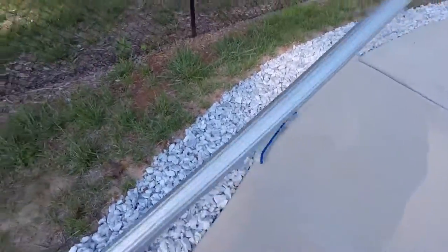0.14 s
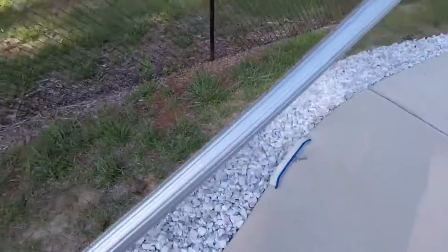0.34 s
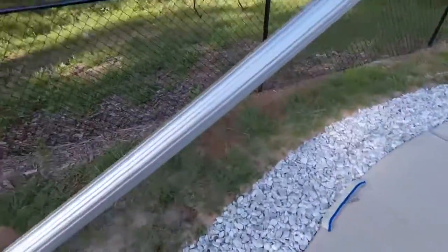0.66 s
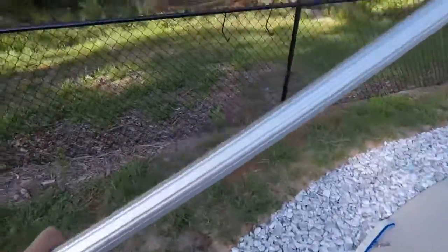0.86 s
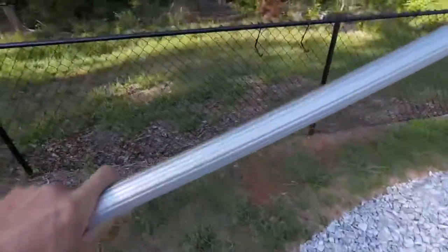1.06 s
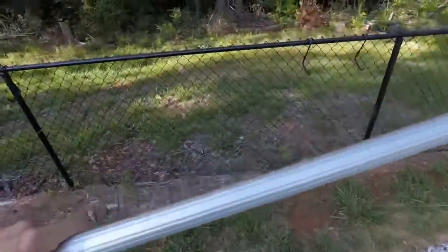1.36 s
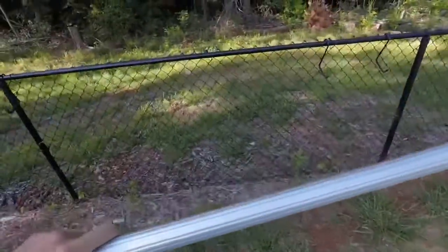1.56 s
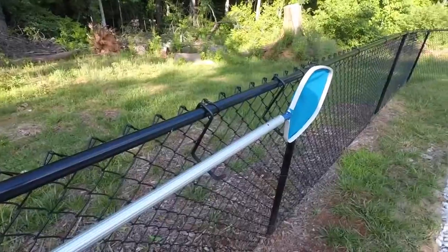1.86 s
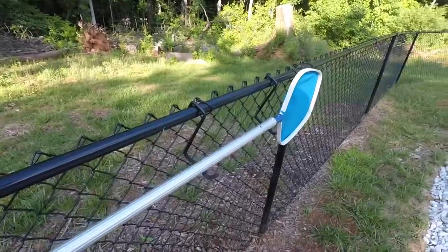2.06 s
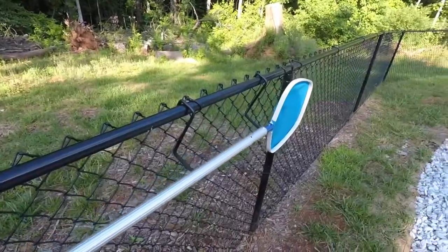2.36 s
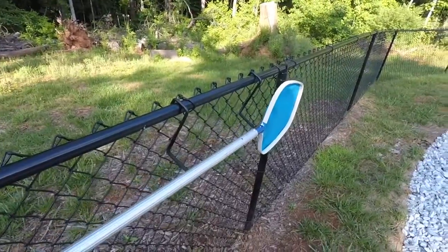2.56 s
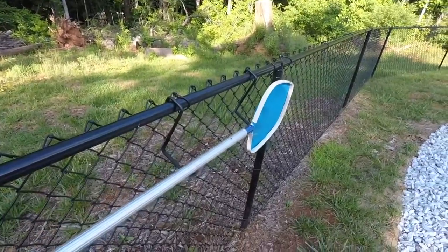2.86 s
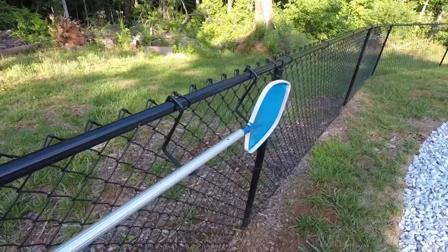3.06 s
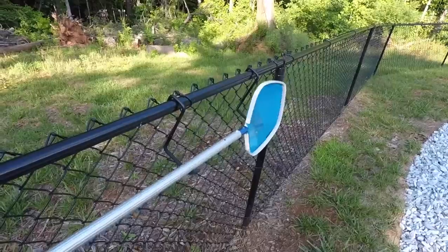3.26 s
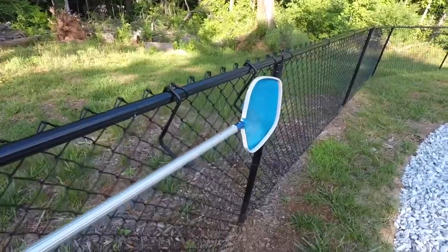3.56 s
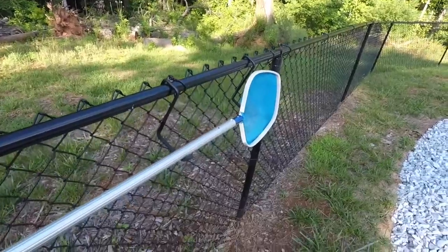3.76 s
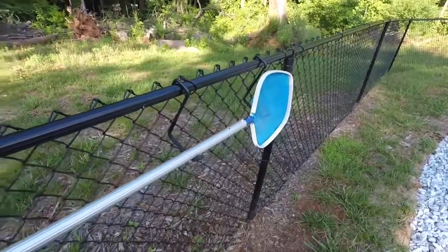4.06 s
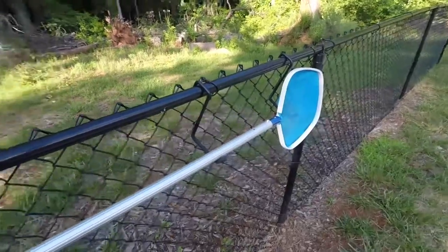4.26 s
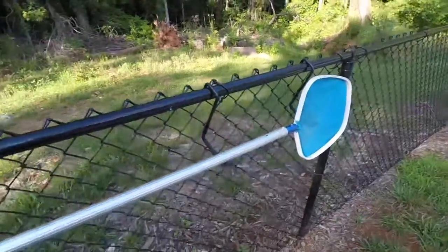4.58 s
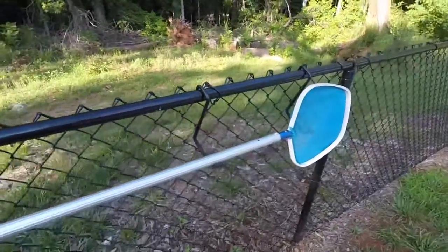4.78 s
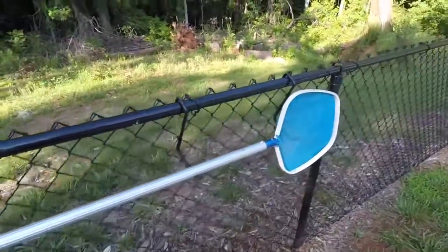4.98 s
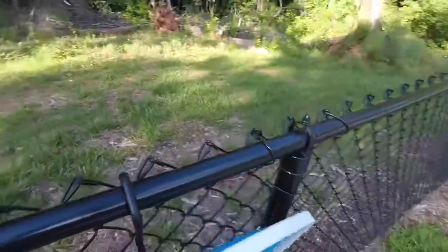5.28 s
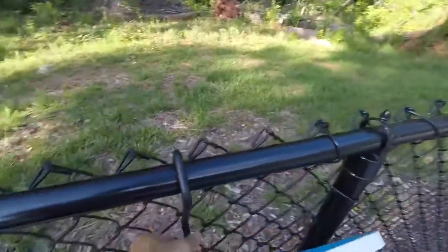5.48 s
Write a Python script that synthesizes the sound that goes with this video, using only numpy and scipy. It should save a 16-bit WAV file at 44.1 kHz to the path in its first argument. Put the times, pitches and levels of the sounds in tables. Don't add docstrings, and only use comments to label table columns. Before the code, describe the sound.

In a garden beside trees, a small hand-held camera microphone catches low wind rumble, faint traffic, soft machine hum and thin leaf hiss throughout. From 0 to 1.6 s someone walks: irregular dry crunches, snaps and scuffs, strongest near 0.13 s, with a dull handling bump near 0.2 s. A small bird repeats swift whistled phrases about every 0.3 s, each plunging from high to low and hooking upward, echoed by fence and trees. A tiny watery plip falls at 1.1 s, and pebbles crunch at 1.5 s. The bird's louder last phrases end by about 2 s. Fast, pulsing high insect trills run about 2.2-2.8, 3.2-3.8 and 4.4-5.2 s, the last strongest. Faint distant chips come near 3.7-4 s. A crisp pole tick at 4.35 s precedes a deep wind buffet. Birdsong resumes around 4.7-5.6 s, with small knocks, a faint drip and another low buffet near the close.

```python
import sys
import numpy as np
from scipy import signal
from scipy.fft import rfft, irfft, next_fast_len
from scipy.io import wavfile
from scipy.ndimage import uniform_filter1d, map_coordinates

SR = 44100
rng = np.random.default_rng(int(sys.argv[2]) if len(sys.argv) > 2 else 0)


def master_out(mix):
    frames = np.transpose(np.atleast_2d(mix))
    ceiling = np.clip(frames, -1, 1)
    pcm = np.round(ceiling * 32767).astype(np.int16)
    wavfile.write(sys.argv[1], SR, pcm)


def volts_from_db(level):
    exponent = np.asarray(level, float) / 20
    return 10 ** exponent


N = 248283


def unit(x):
    return x / np.sqrt(np.mean(x ** 2) + 1e-20)


def along(points, hz):
    f, v = np.transpose(points)
    return np.interp(np.log(hz + 0.054), np.log(f), v)


def curves(rows, t):
    s, *cols = np.transpose(rows)
    return [np.interp(t, s, c) for c in cols]


def wobble(rate):
    return map_coordinates(rng.standard_normal(int(N * rate / SR) + 4), [np.arange(N) * rate / SR])


def bump(t, s, width):
    return np.exp(-.5 * ((t - s) / max(width, .005)) ** 2)


def coloured(x, spectrum):
    m = next_fast_len(N + 8192)
    gain = volts_from_db(along(spectrum, np.fft.rfftfreq(m, 1 / SR)))
    return irfft(rfft(x, m) * unit(gain), m)[:N]


def noise(spectrum):
    return unit(coloured(rng.standard_normal(N), spectrum))


def add(track, s, sound):
    part = track[round(s * SR):][:len(sound)]
    part += sound[:len(part)]


# moment in seconds, width in seconds, head change in dB, tail change in dB.
BODY_TURN = (4.81, .035, 4, -14)


def stroke(s, first, last, levels):
    head_db, swell_db, tail_db, start_db = levels
    warm_up_s, tail_swell = .035, 0.47
    left = (last - s) / (last - first)
    soft_db = start_db * np.exp(-(s - first) / warm_up_s)
    turn = bump(s, *BODY_TURN[:2])
    return (head_db - swell_db * left - .5 * soft_db + BODY_TURN[2] * turn,
            tail_db - tail_swell * swell_db * left - soft_db + BODY_TURN[3] * turn)


# onset of the last pulse in seconds, number of pulses, pulses per second.
TRILLS = [(2.7765, 35, 57.1), (3.782, 32, 57.1), (5.016, 35, 57.1), (5.2335, 12, 57.4)]
# high head of the last pulse in dB, head swell over the trill in dB,
# low tail in dB, softer start in dB.
TRILL_LEVELS = [(-61.5, 10, -60, 14), (-60.5, 14, -58, 10), (-55.5, 4, -55, 36), (-56, 12, -57, 0)]
FILE_REACH = [1.04, 1.12, 1.0, 1.0]


def insect():
    early_sag = .038
    ground_db, ground_s, ground_drift = 3, .0008, .5
    leaf_db, leaf_s = -12.5, .004
    out, t = np.zeros(N), np.arange(round(.011 * SR)) / SR
    u = t / 0.0077
    for (last, count, rate), levels, reach in zip(TRILLS, TRILL_LEVELS, FILE_REACH):
        chance = rng.standard_normal((count, 4))
        bounce = np.cumsum(ground_drift * rng.standard_normal(count)) + 2 * np.pi * rng.random()
        edge = np.clip(t / .0011, 0, 1) * np.clip((reach - u) / .25, 0, 1)
        for k, (late, size, detune, beat) in enumerate(chance):
            s = last - k / rate + 0.00038 * late
            head_db, tail_db = stroke(s, last - count / rate, last, levels)
            level = volts_from_db(head_db + (tail_db - head_db) * np.clip(4 * u - 1.9, 0, 1) + .3 + 2.1 * size)
            flutter = 1 + 0.17 * np.sin(2 * np.pi * 330 * t + 3 * beat)
            hz = (7200 - 350 * u - 950 * u ** 2) * (1 + 0.0057 * detune - early_sag * k / count)
            level *= volts_from_db(ground_db * np.cos(2 * np.pi * hz * ground_s + bounce[k]))
            chirp = edge * level * flutter * np.sin(2 * np.pi * np.cumsum(hz) / SR)
            add(out, s, chirp)
            add(out, s + leaf_s * (1 + .3 * np.tanh(beat)), volts_from_db(leaf_db) * chirp)
    return out


def whistle(note, t, db):
    hz, level = curves(note, t)
    alive = (t > note[0][0]) & (t < note[-1][0])
    return alive * volts_from_db(db + level) * np.sin(2 * np.pi * np.cumsum(hz) / SR)


def twigs(tone, spread, scatter_db):
    path = np.zeros(round(spread * SR) + 2)
    path[0] = 1
    where, size = rng.random((2, 5))
    path[1 + (where * (len(path) - 2)).astype(int)] = volts_from_db(scatter_db) * (2 * size - 1)
    return np.convolve(tone, path / np.linalg.norm(path))


# frequency in Hz, t60 in seconds.
WOOD_T60 = [(1500, 0.75), (2900, 1.55), (4500, .9), (7000, 0.55)]
# frequency in Hz, level in dB.
WOOD_COLOUR = [(1500, -2), (3000, -6), (4500, 0), (6000, 7), (7000, 2.5)]


def trees(x):
    hz, t, z = signal.stft(rng.standard_normal(SR * 3 // 2), SR, nperseg=256)
    fade_db = along(WOOD_COLOUR, hz)[:, None] - 60 * t / along(WOOD_T60, hz)[:, None]
    tail = signal.istft(z * volts_from_db(fade_db) * np.clip(t / .04, 0, 1), SR, nperseg=256)[1]
    return volts_from_db(-34.5) * signal.fftconvolve(x, tail)[:len(x)]


def brightened(note, late, slope_db, gap_db):
    s, hz, level = np.transpose(note)
    gap = gap_db * np.exp(-.5 * (np.log2(hz / 5470) / 0.093) ** 2)
    tilt = slope_db * np.log2(hz / 3800)
    return np.transpose([s + late * np.clip(s / .04, 0, 1), hz, level + gap + tilt])


# time from phrase start in seconds, pitch in Hz, level in dB.
HOOK = [(.16, 2050, -26), (.165, 2280, -6), (.171, 2620, -4), (.177, 2830, -2), (.185, 2945, 0),
        (.192, 2905, -3), (.198, 2780, -9), (.203, 2660, -30)]


def hooks(ratio):
    sung = np.multiply(HOOK, [1, ratio, 1])
    duller_db = 11 * np.log2(sung[:, 1] / sung[:, 1].max())
    return sung, sung + np.outer(duller_db, [0, 0, 1])


# time from phrase start in seconds, pitch in Hz, level in dB.
HEAD = [(0, 6950, -20), (.008, 6800, -11), (.022, 6680, -9), (.04, 6560, -26)]
FALL = [(0, 6950, -26), (.008, 6830, -20), (.036, 6150, -17), (.042, 5900, -15), (.046, 5400, -13),
        (.05, 4700, -8), (.056, 3800, -3), (.065, 3120, -7), (.073, 2890, -8), (.079, 2860, -35)]
LOW = [(.08, 2270, -32), (0.085, 2240, -11), (0.096, 2130, -9), (0.11, 2060, -10), (.12, 2040, -40)]
FLICK = [(.203, 3700, -24), (.207, 3200, -12), (.211, 2750, -7), (.216, 2500, -4), (.228, 2420, -5),
         (.242, 2390, -26)]
ECHO_S = [.0215, .024, .031]


def phrase(row, facing, droop, manner, gap_db, hook_ratio, wet_db):
    s, shift, fall_db, hook_db, wall_db = row
    low_db, flick_db, fence_db, head_db, near_db = facing
    late, lag, bright_db, fence_bright_db = manner
    t = np.arange(SR // 4) / SR
    sagging = HEAD[0] + np.subtract(HEAD, HEAD[0]) * [1, droop, 1]
    head = whistle(sagging, t, fall_db + head_db)
    fall = whistle(brightened(FALL, late, bright_db, gap_db), t, fall_db)
    fence = whistle(brightened(FALL, late, fence_bright_db, gap_db), t, fall_db)
    low = whistle(LOW, t - late, hook_db + low_db) + whistle(FLICK, t - shift - lag, hook_db + flick_db)
    low, wall = [low + whistle(hook, t - shift, hook_db) for hook in hooks(hook_ratio)]
    song = np.zeros(N + SR)
    add(song, s + 1, fall + low + head)
    heard = volts_from_db(wet_db) * trees(song)
    add(heard, s + 1, twigs(fall + volts_from_db(near_db) * head, spread=.008, scatter_db=-2))
    add(heard, s + 1, twigs(low, spread=.006, scatter_db=-7))
    add(heard, s + 1 + ECHO_S[0], volts_from_db(fence_db) * twigs(fence, spread=.01, scatter_db=-1))
    add(heard, s + 1 + ECHO_S[1], volts_from_db(wall_db) * twigs(wall, spread=.004, scatter_db=-13))
    add(heard, s + 1 + ECHO_S[2], twigs(head, spread=.008, scatter_db=-3))
    return heard


CUTS = [0, 1.605, 5.026, 6]
# start in seconds, shift of the hook in seconds, fall level in dB,
# lower notes in dB, wall echo in dB.
PHRASES = [
    [(-.176, 0, -56, -61, 0), (.124, -0.012, -49.5, -47.5, -2), (.404, 0.00074, -47, -45, 2),
     (.695, 0.0011, -46, -44, 0), (.983, 0.0017, -48, -45, 1.5)],
    [(1.383, 0.0044, -40, -40.5, -0.5), (1.682, 0, -40.5, -41.5, -2)],
    [(4.73, 0, -50, -48.5, 0.5), (5.024, 0.00029, -45, -43.5, -1.5), (5.319, 0.0065, -49, -48, -0.3)],
]
# low note in dB, flick in dB, fence echo of the fall in dB,
# head in dB, direct share of the head in dB.
FACING = [
    [(9, 0, -4, 0, -8), (3.5, 4.5, -1.5, 0, -8), (2.5, -0.5, 2, -2.5, -3), (3.5, 0.5, 1, -2, -7),
     (3.5, -0.5, -3, -1.5, 2)],
    [(1.5, -4, -5, -12, -6), (1.5, -0.5, -6, -7, -9)],
    [(-4, 3.5, -2, -9, -6), (2, -2.5, 3.5, -10, -3), (-1, 0.5, 2.5, -11, 9)],
]
DROOP = [
    [1, 1.3, 1, 1.1, 2],
    [1, 1],
    [1, 1, 1.2],
]
# delay of the fall in seconds, delay of the flick in seconds,
# brightness of the fall in dB per octave, brightness of its echo in dB per octave.
MANNER = [
    [(0, 0.0022, 0, 0), (0, .008, -4, 0), (.0015, 0.0043, 1, 2), (0.0015, 0.00032, 0, 3), (.003, 0, 7.5, 8)],
    [(0, .007, -1, 0), (0, 0.00203, -2, 0)],
    [(0, 0.0027, 0, 0), (0.0003, .001, -4, 1), (.007, 0.0013, 1, 2)],
]
WET_DB = [2.5, -3, 1.5]


def wren():
    out, clock = np.zeros(N), np.arange(N) / SR
    gap_dbs, hook_ratios = [-3, -9, -13], [1.02, 1.005, 1.005]
    for shot, (start, end) in enumerate(zip(CUTS, CUTS[1:])):
        place = gap_dbs[shot], hook_ratios[shot], WET_DB[shot]
        rows = zip(PHRASES[shot], FACING[shot], DROOP[shot], MANNER[shot])
        heard = sum(phrase(*row, *place) for row in rows)
        shown = np.clip((clock - start) / .004, 0, 1) * np.clip((end - clock) / .004, 0, 1)
        out += heard[SR:] * shown
    return out


def contacts(events):
    grit, thud, t = np.zeros(N), np.zeros(N), np.arange(SR // 20) / SR
    for s, db, low_db, t60 in events:
        a, b, spikes = rng.standard_normal((3, len(t)))
        shape = volts_from_db(db - 60 * t / max(t60, .003)) * np.clip(t / .0005, 0, 1)
        add(grit, s, shape * volts_from_db(-3.5 + 3.5 * spikes) * a)
        add(thud, s, shape * volts_from_db(low_db + 0.5) * b)
    return grit, thud


# start in seconds, peak in dB, low thud in dB.
PEBBLE_STEP = [(1.507, -48, -7), (1.5095, -48, -7), (1.51, -39, -11), (1.516, -38.5, -9), (1.5201, -37, -9),
               (1.5268, -34, -6), (1.5322, -42, -7), (1.5364, -42, -7), (1.5427, -45, -7),
               (1.5482, -43, -5), (1.5516, -44, -7), (1.5554, -48, -7), (1.5664, -48, -4), (1.574, -48, -5),
               (1.5736, -44, -6), (1.5776, -47, -5), (1.5824, -44, -6), (1.5874, -49, -5),
               (1.5924, -50, -7), (1.5993, -51, -7), (1.6054, -49, -5)]


def stones():
    chance = 2 * rng.random((len(PEBBLE_STEP), 2)) - 1
    return [(s, db - 4 + 0.5 * size, low_db, 0.012 * (1 + 0.27 * ring))
            for (s, db, low_db), (ring, size) in zip(PEBBLE_STEP, chance)]


def drag(rows):
    out = np.zeros(N)
    for s, length, db, fade_db in rows:
        t = np.arange(0, length, 1 / SR)
        rise = t + (s < .001)
        edge = np.clip(np.minimum(rise, length - t) / 0.011, 0, 1)
        spikes = uniform_filter1d(rng.standard_normal(len(t)), size=40)
        add(out, s, edge * volts_from_db(db + fade_db * t / length + 2.5 * unit(spikes)) * rng.standard_normal(len(t)))
    return out


def snaps(rows):
    roughness, width = 0.67, .25
    out, t = np.zeros(N), np.arange(SR // 14) / SR
    for s, db, hz, t60 in rows:
        rough = unit(uniform_filter1d(rng.standard_normal(len(t)), size=round(SR / (width * hz))))
        ring = (1 + roughness * rough) * np.sin(2 * np.pi * hz * t)
        add(out, s, volts_from_db(db - 60 * t / max(t60, .003)) * np.clip(t / .001, 0, 1) * ring)
    return out


# start in seconds, peak in dB, low thud in dB, t60 in seconds.
STEPS = [(0.0154, -51, -5, 0.02), (0.0285, -44, -14, 0.022), (0.0425, -43, -7, 0.029),
         (0.1225, -35.5, -35, 0.033), (0.129, -34.5, -5, 0.0094), (0.1324, -48, -0.5, 0.057),
         (0.177, -42, -15, 0.058), (0.181, -42, -22, 0.012), (0.2655, -47, -21, 0.065),
         (0.2774, -49, -7, 0.024), (0.2864, -49.5, -2, 0.029), (0.3822, -44.5, -22, 0.017),
         (0.409, -49, -6, 0.028), (0.5432, -47, -8, 0.017), (0.82, -46.5, -9, 0.029),
         (0.8262, -47, -8, 0.027), (0.8488, -49, -6, 0.031), (1.1367, -46, -7, 0.016),
         (1.2252, -44, -2, 0.036), (1.2372, -47, -4, 0.025), (1.3175, -54.5, 0.5, 0.042),
         (1.4216, -52, -8, 0.019), (3.2904, -58, -17, 0.015), (4.3469, -37.5, -16, 0.0091),
         (5.033, -53, -1, 0.016), (5.3165, -50, 3, 0.014), (5.5658, -56, 4, 0.017)]
# start in seconds, length in seconds, peak in dB, fade in dB.
SCUFF = [(0, 0.3, -69, -20), (.805, .07, -61, -9), (1.135, 0.108, -62, -8)]
PEBBLE_SCUFF = [(1.502, 0.058, -57.5, 0), (1.556, 0.062, -59.5, -6)]
SWISH = [(1.148, .075, -61.5, -7)]
# start in seconds, peak in dB, pitch in Hz, t60 in seconds.
SNAPS = [(.029, -47, 4500, .02), (.032, -43, 2300, .015), (.043, -45.5, 8600, 0.014),
         (.123, -45, 8900, .015), (.129, -41, 8400, .015), (.124, -56, 624, 0.054), (.124, -48.5, 858, .06),
         (.178, -48, 8600, .03), (.181, -44.5, 5550, 0.027), (.18, -52, 13200, .02),
         (.2655, -47.5, 8440, .02), (.2655, -49, 3870, .02), (.278, -49, 8600, 0.016),
         (.821, -50, 7650, 0.032), (.823, -46, 5550, .02), (1.137, -46.5, 7650, .015),
         (1.137, -49, 3600, .012), (1.139, -53, 525, .07), (1.225, -45, 9000, .02), (1.226, -49, 840, .07),
         (1.226, -50, 640, .07), (1.317, -55, 7540, .02), (1.318, -52, 9800, .015),
         (1.424, -58, 4600, .012), (1.527, -40, 6500, .012), (1.607, -52, 6800, .015),
         (3.292, -52, 8200, 0.011), (5.033, -43, 720, .014), (.411, -55, 9360, .02),
         (5.317, -53, 7900, .012), (5.317, -50, 4200, .012)]
# frequency in Hz, level in dB per Hz.
GRIT = [(1180, -13), (2000, -10), (2700, -2), (3850, -6.5), (4260, -3.5), (5220, -8), (6740, -8.5),
        (15200, -31)]
PEBBLES = [(1200, -35), (2200, -6.5), (3500, -4.5), (4800, -7.5), (6000, 0.5), (7500, -0.5), (10000, -15),
           (15300, -32)]
THUD = [(150, -120), (300, -25), (600, -5), (1200, 8.5), (2200, -6), (3500, -50), (6000, -120)]
HISS = [(4000, -120), (6000, -19), (8000, 0.5), (10000, -2), (13000, -2.5), (16000, -4)]


def feet():
    grit, thud = contacts(STEPS)
    pebbles, push = contacts(stones())
    out = coloured(grit + drag(SCUFF), GRIT)
    out += coloured(pebbles + drag(PEBBLE_SCUFF), PEBBLES)
    out += coloured(thud + push, THUD)
    return out + coloured(drag(SWISH), HISS) + snaps(SNAPS)


# pitch in Hz, level in dB, t60 in seconds.
TICK = (4.3474, [(2300, -48, 0.01), (3600, -38, 0.0058), (6400, -37.5, 0.0056), (9500, -48, 0.0052)])
# start in seconds, peak in dB, pitch in
# Hz, t60 in seconds.
MORE_SNAPS = [(.383, -50, 3020, .012), (.384, -51, 8600, .012), (1.079, -52, 4200, .01),
              (1.079, -54, 5800, .01), (5.033, -53, 450, .015), (5.322, -48.5, 450, .045),
              (5.316, -54, 799, 0.018)]


def pole():
    out, t = np.zeros(N), np.arange(SR // 50) / SR
    s, modes = TICK
    add(out, s, sum(volts_from_db(db - 60 * t / t60) * np.sin(2 * np.pi * hz * t) for hz, db, t60 in modes))
    return out + snaps(MORE_SNAPS)


# start in seconds, peak in dB, pitch in Hz, life in seconds.
DRIPS = [(1.078, -37, 945, 0.0081), (2.661, -59, 923, 0.044), (5.53, -48, 880, 0.0113)]


def drips():
    out = np.zeros(N)
    for s, db, hz, life in DRIPS:
        climb = 0.0035 / life
        u = np.arange(0, 1, 1 / (life * SR))
        tone = np.sin(2 * np.pi * np.cumsum(hz * (1 + climb * u)) / SR)
        add(out, s, volts_from_db(db) * np.sin(np.pi * u) ** 1.15 * tone)
    return out


# centre in seconds, peak in dB, pitch in Hz, width in seconds.
BUMPS = [(.172, -41.5, 105, .007), (0.853, -47, 102, 0.0057), (1.135, -52, 75, 0.011),
         (1.385, -55, 90, 0.0066), (4.775, -47, 120, .007), (5.025, -42, 70, .008)]


def bumps():
    t = np.arange(N) / SR
    return sum(volts_from_db(db) * bump(t, s, width) * np.sin(2 * np.pi * hz * (t - s)) for s, db, hz, width in BUMPS)


# level at the cut in dB, fade in dB per second.
STIR = [(11.5, 5.5), (-10, -3), (1.5, 1)]


def stir(db):
    t = np.arange(N) / SR
    shot = np.searchsorted(CUTS, t, side="right") - 1
    start_db, fade_db = np.transpose(STIR)[:, shot]
    return np.sqrt(1 + volts_from_db(db + start_db - fade_db * (t - np.take(CUTS, shot))) ** 2)


# time in seconds, strength in dB.
WIND = [(0.0, -33), (0.05, -48), (0.09, -26.5), (0.56, -25.5), (0.61, -34), (0.8, -25), (1.11, -29),
        (1.16, -25), (2.49, -41), (3.56, -33), (3.59, -39.5), (4.34, -25.5), (4.39, -40), (4.44, -29),
        (4.8, -23), (4.84, -27), (5.57, -26), (5.63, -32.5)]
# resting level in dB, how far it follows the strength in dB per dB.
LAYERS = [(-55.5, -0.02), (-62, 0.41), (-68.5, 0.28)]
# centre in seconds, width in seconds, buffet in dB,
# thump in dB, rush in dB.
JOLTS = [(0, 0.012, -41, -55, -71), (.175, 0.026, -55, -51.5, -66), (.33, 0.043, -54, -67, -65),
         (.56, 0.032, -65, -68, -67), (.7, 0.037, -66, -63, -68), (.85, 0.029, -68, -60.5, -75),
         (1.02, 0.036, -51, -67, -96), (1.17, 0.032, -63, -56, -84), (1.38, 0.022, -49, -59, -87),
         (1.56, 0.029, -49, -65, -58.5), (1.61, 0.0062, -39, -71, -71), (3.43, 0.052, -49, -76, -88),
         (3.87, 0.034, -43.5, -73, -86), (4.09, 0.027, -53, -66, -90), (4.27, 0.039, -44, -63, -66.5),
         (4.43, 0.049, -27.5, -47, -69.5), (4.77, 0.014, -63, -54, -69), (4.9, 0.026, -55, -64, -78),
         (5.015, 0.012, -32, -60, -72), (5.22, 0.27, -59, -60, -83), (5.63, 0.023, -33.5, -59, -67)]
# frequency in Hz, level in dB per Hz.
PRESSURE = [(1, 10.5), (3, 21.5), (12, 16), (22, 5), (30, -58), (45, -120)]
BUFFET = [(10, -120), (16, -30), (24, 9), (40, -15), (60, -18.5), (80, -81), (120, -120)]
THUMP = [(30, -120), (45, -28), (60, 2), (120, 0), (220, -9.5), (280, -68), (400, -120)]
RUSH = [(110, -120), (170, -28), (230, 0), (380, -0.5), (600, -7.5), (800, -17), (1200, -120)]


def wind():
    t = np.arange(N) / SR
    strength_db, = curves(WIND, t)
    gust_db = uniform_filter1d(strength_db, size=round(.3 * SR))
    calm_db = -29.5
    buffet, thump, rush = [volts_from_db(db + follows * (gust_db - calm_db)) for db, follows in LAYERS]
    knocks = sum(volts_from_db(np.array(dbs))[:, None] * bump(t, s, width) for s, width, *dbs in JOLTS)
    eddy = wobble(24.94)
    out = volts_from_db(strength_db) * noise(PRESSURE) + (buffet + knocks[0]) * noise(BUFFET)
    out -= volts_from_db(-20) * np.exp(-t / .011)
    out += (thump + knocks[1]) * unit(volts_from_db(1.4 * eddy) * noise(THUMP))
    return out + (rush * stir(-1) + knocks[2]) * unit(volts_from_db(1.33 * eddy) * noise(RUSH))


# time in seconds, pitch in Hz, level in dB.
CHIP = [(0, 3800, -12), (.004, 3900, 0), (.011, 4350, -2), (.015, 4600, -14)]
# start in seconds, level in dB, pitch ratio.
CHIPS = [(3.704, -68, 1), (3.73, -73, 1.05), (3.822, -66, 1), (3.848, -72, 1.07), (3.838, -70, .85),
         (3.96, -72, .85)]


def far_bird():
    out = np.zeros(N)
    s, hz, level = np.transpose(CHIP)
    for start, db, ratio in CHIPS:
        chip = whistle(np.transpose([s, ratio * hz, level]), np.arange(SR // 50) / SR, db)
        add(out, start, twigs(chip, spread=.006, scatter_db=-2))
    return out


# time in seconds, level in dB.
TRAFFIC_LEVEL = [(0.0, -61.5), (1.35, -65), (1.8, -67), (3.62, -66.5), (4.3, -62.5), (4.67, -65),
                 (5.33, -59.5), (5.63, -61)]
# frequency in Hz, level in dB per Hz.
TRAFFIC = [(300, -120), (500, -9), (700, -2), (1000, 0), (1500, -1), (2200, -6.5), (3500, -24), (5000, -28),
           (7700, -120)]
LEAVES = [(1500, -120), (2500, -1), (3500, -3.5), (5200, -4.5), (7000, -5), (9000, -19), (12000, -120)]
CHORUS = [(5000, -120), (5900, -3), (6200, -5), (6600, -18), (7200, -21), (8000, -120)]
# start in seconds, end in seconds, pitch in Hz, rms level in dB.
HUMS = [(.25, 1.6, 121, -65), (1.6, 3.5, 119, -68), (1.75, 2.5, 179, -74), (4.9, 6, 71, -68),
        (4.9, 6, 105, -66), (0, 6, 241, -78), (0, 6, 357, -79)]


def distance():
    t = np.arange(N) / SR
    traffic_db, = curves(TRAFFIC_LEVEL, t)
    out = volts_from_db(traffic_db + 1.0 + 0.39 * wobble(8.8)) * noise(TRAFFIC)
    out += stir(0) * volts_from_db(-73.5 + 0.66 * wobble(4.85)) * noise(LEAVES)
    out += stir(-5) * volts_from_db(-73) * noise(HISS)
    out += volts_from_db(-83.0 + 1.1 * wobble(3.13)) * noise(CHORUS)
    for start, end, hz, db in HUMS:
        on = np.clip((t - start) / 0.039, 0, 1) * np.clip((end - t) / 0.1, 0, 1)
        level = np.sqrt(2) * volts_from_db(db + 2.5 * wobble(6))
        out += on * level * np.sin(2 * np.pi * np.cumsum(hz + 1.5 * wobble(5)) / SR)
    return out


def scene():
    near = insect() + wren() + feet() + pole() + drips() + bumps()
    return (near + wind() + far_bird() + distance())[None]


def below(x, top_hz):
    m = next_fast_len(N + SR)
    wide = np.pad(x, ((0, 0), (SR // 2, m - N - SR // 2)), mode="reflect")
    return irfft(rfft(wide) * (np.fft.rfftfreq(m, 1 / SR) < top_hz), m)[:, SR // 2:][:, :N]


def top_cut(x):
    return signal.sosfilt(signal.butter(12, 15390, fs=SR, output="sos"), x)


# start in seconds, end in seconds.
DULL_MOMENTS = [(.231, .268), (.375, .435), (.53, .565), (.085, .118), (.79, .815), (.87, .955),
                (1.255, 1.32), (1.425, 1.465), (1.552, 1.59), (1.597, 1.612), (1.815, 1.855), (1.955, 2.05),
                (3.27, 3.31), (3.405, 3.46), (3.83, 3.89), (3.995, 4.125), (4.2, 4.343), (4.39, 5.025),
                (5.3, 5.34), (5.41, 5.45), (5.51, 5.63)]


def record(dry):
    t = np.arange(N) / SR
    body = below(dry, 13000)
    top = below(dry, 15400) - body
    open_top = 1 - sum(1.0 * (t > start) * (t < end) for start, end in DULL_MOMENTS)
    open_top = np.maximum(open_top, .22 * (t < CUTS[1] + .01))
    kept = body + top * uniform_filter1d(open_top, size=400)
    return top_cut(kept)


dry = scene()
out = record(dry)
master_out(out)
```